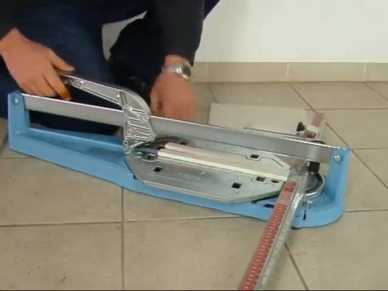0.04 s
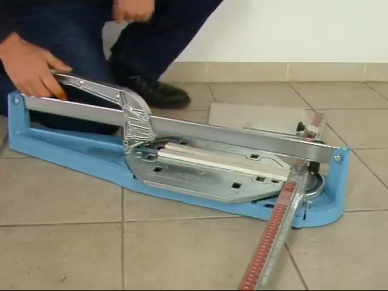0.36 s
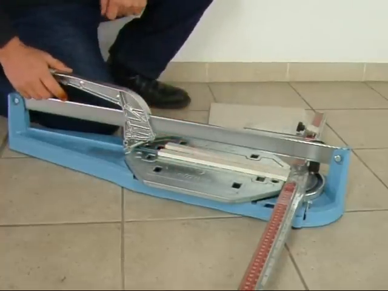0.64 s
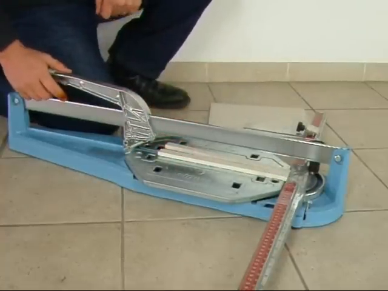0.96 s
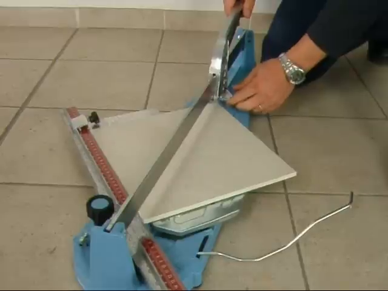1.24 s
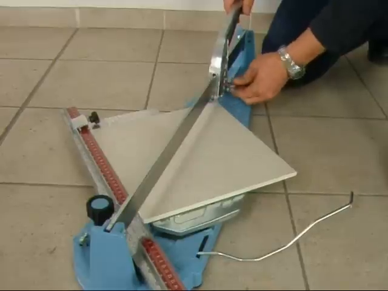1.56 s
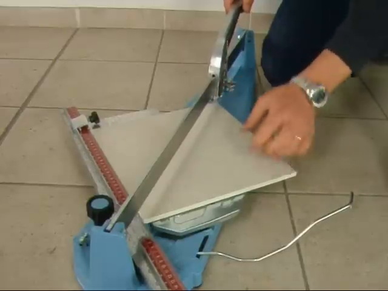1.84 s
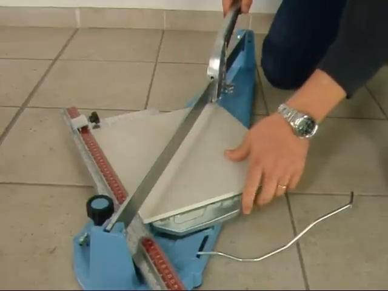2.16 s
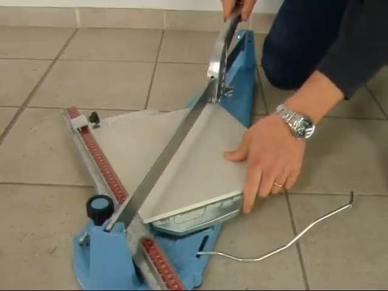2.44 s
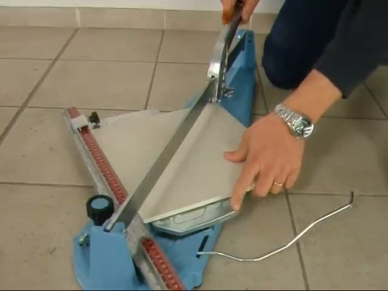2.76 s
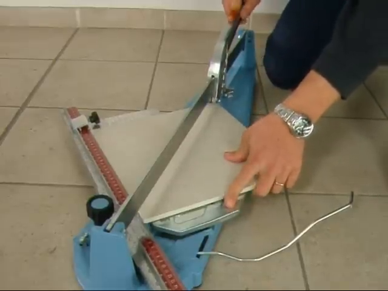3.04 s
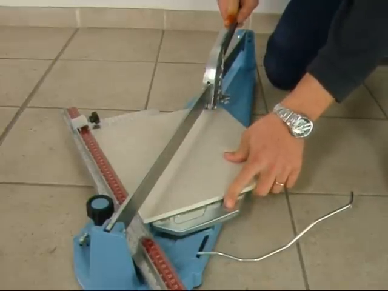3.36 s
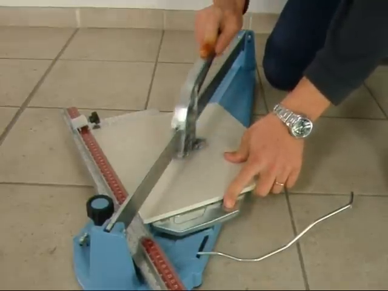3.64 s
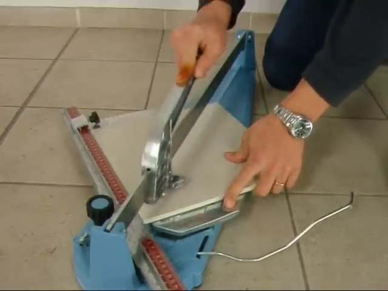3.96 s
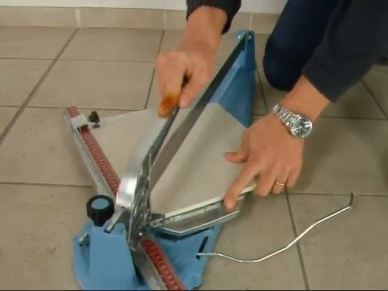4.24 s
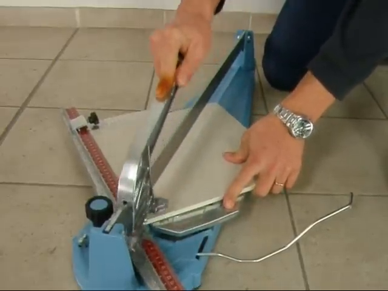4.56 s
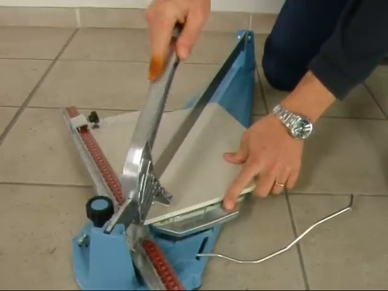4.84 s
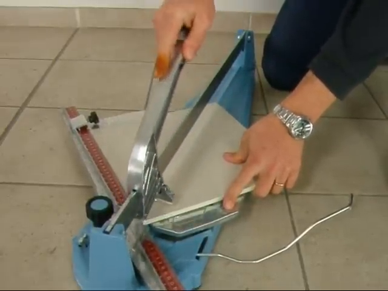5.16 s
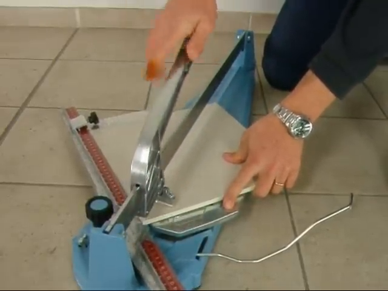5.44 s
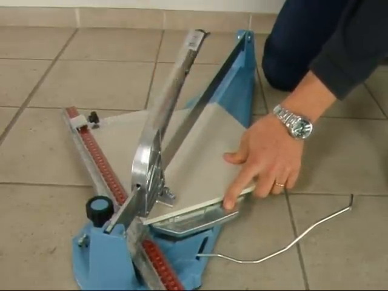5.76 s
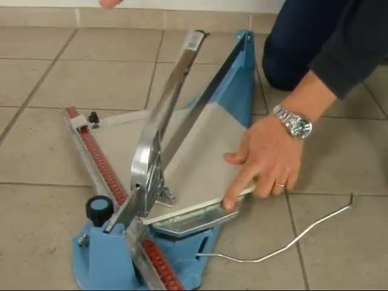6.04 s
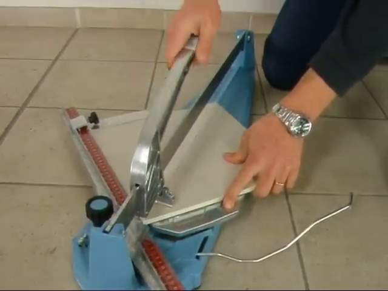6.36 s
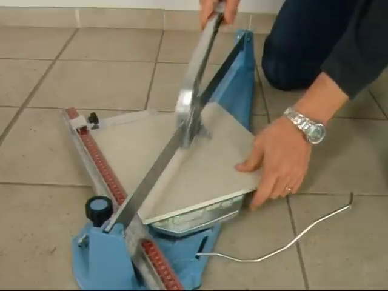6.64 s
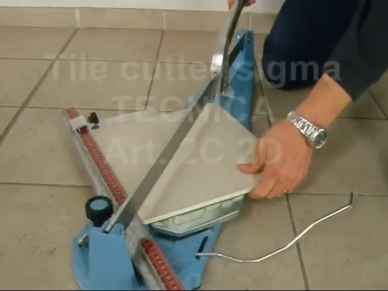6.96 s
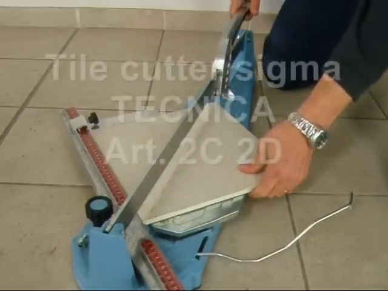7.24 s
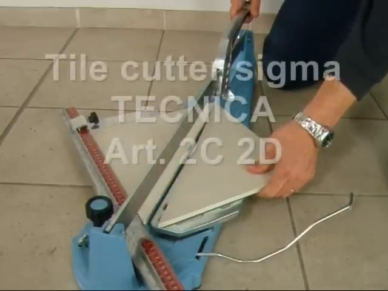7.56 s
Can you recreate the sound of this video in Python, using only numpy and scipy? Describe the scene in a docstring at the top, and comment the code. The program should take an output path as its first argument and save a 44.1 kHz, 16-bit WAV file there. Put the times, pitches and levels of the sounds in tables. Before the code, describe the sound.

In a bare, hard-walled room, clothes rustle as a tile is bumped into place on a manual cutter's ringing steel bed. The wheel taps down several times and scrapes grittily across the glaze, ending in a metal clack. A lever clicks, the tile snaps with a sharp crack, and the carriage slides back softly. The sound is fairly close and grainy, with faint hiss and electrical ticking.

```python
"""A manual tile cutter on the floor of a bare, tiled room. Clothes rustle as a tile is settled on the
sprung steel bed, which bumps and rings. The wheel taps down and is pushed across the glaze, crushing it
and driving the tile's modes. The carriage clacks into its stop, the lever clicks up, the tile snaps and
its halves strike the bed. The carriage slides back. Throughout, hard walls reverberate and a coarse
8-bit converter adds grit and faint electrical ticking."""
import sys
import numpy as np
from scipy import signal
from scipy.fft import rfft, irfft
from scipy.io import wavfile
from scipy.ndimage import uniform_filter1d

SR = 44100
rng = np.random.default_rng(int(sys.argv[2]) if len(sys.argv) > 2 else 0)


def to_wav(sig):
    """Store sig (one row per channel, or 1-D mono) as 16-bit WAV at the path in sys.argv[1].

    Samples outside -1..1 are clipped; the rate is SR.
    """
    pcm = np.clip(np.atleast_2d(sig), -1, 1) * 32767
    pcm = np.round(pcm).astype(np.int16)
    wavfile.write(sys.argv[1], SR, pcm.T)  # frames by channels


N = 335160
TIME_S = np.arange(N) / SR
CONVERTER_HZ, LSB = 16000, 1 / 128

# interference bursts in each cycle: (start [s], tick spacing [s], ticks [count], polarity [+/-1])
TICK_BURSTS = [(.001, .00256, 6, 1), (.0393, .00512, 4, -1), (.0436, .00256, 7, 1)]
# room decay: (frequency [Hz], t60 [s])
ROOM_T60 = [(150, 0.65), (600, 1.1), (1700, 1.2), (4500, 0.91), (8000, .7), (12000, 0.65)]

# spectra of hiss, friction and crushed glaze: (frequency [Hz], density [dB])
HISS_SPECTRUM = [(20, 10), (150, 3.5), (1000, -8), (4000, -11.5), (12000, -12.5)]
CLOTH_SPECTRUM = [(24, -112), (40, -36), (55, -11.5), (123, -2.5), (283, -6.5), (343, -2.5), (425, -5.5),
                  (539, 2), (622, -4.5), (1270, -6.5), (8000, -19.5)]
SLIDE_SPECTRUM = [(40, -35), (102, -14), (404, -13), (658, -2), (821, -10), (897, -1), (1400, -11),
                  (1630, -2.5), (2080, -6), (8000, -18.5)]
GLAZE_SPECTRUM = [(18, -41), (30, -22.5), (182, -16.5), (253, -19), (377, -6), (497, -11.5), (623, -7.5),
                  (761, -9.5), (1080, -8.5), (1580, -4.5), (2240, -6), (2540, -7), (3790, -5.5), (8000, -6)]
# friction moves: (start [s], length [s], level [dB])
CLOTH_RUSTLES = [(1.125, 0.49, -46), (1.8, 0.9, -56.5), (2.06, 0.29, -51.5), (2.63, .09, -48),
                 (2.88, 0.57, -52), (5.0, .28, -62)]
CARRIAGE_SLIDES = [(4.83, .06, -49), (5.37, .16, -56.5), (6.41, 0.045, -55), (6.54, .45, -49.5),
                   (7.09, 0.1, -57), (7.35, 0.22, -58.5)]

# blows: (time [s], level [dB], tilt [dB/octave], clatter t60 [s], ring [dB])
PLATE_BUMPS = [(1.1295, -33, -2, 0.65, 7), (1.4868, -20.5, -3.5, 0.11, 2), (7.1095, -29, 2.5, 0.11, -2)]  # sprung plate under the tile
BED_KNOCKS = [(1.613, -20.5, 1.5, 0.27, 8.5), (1.6335, -12, 3, 0.045, -10), (2.348, -45, -6.5, 0.12, -3),
              (2.657, -42, -5.5, 0.21, -1.5), (2.692, -41, -3, 0.24, 1), (5.374, -45.5, -0.5, 0.051, 4.5),
              (5.381, -35.5, 1.5, 0.19, 0.5), (6.52, -50, 1.5, 0.22, -4.5), (6.66, -49.5, -3, 0.097, 7.5),
              (6.715, -47, -3.5, 0.13, -2.5)]  # tile and carriage on the steel bed
WHEEL_TAPS = [(2.605, -37.5, -1, 0.096, -14.5), (2.9105, -24.5, 0, .11, 0.5), (3.0635, -30, -1, 0.096, 4),
              (3.102, -32.5, -.5, 0.095, -2.5), (3.175, -42, 0, 0.033, -16), (3.351, -21.5, 1, 0.17, 11),
              (3.3615, -31, 0.5, 0.041, -13), (3.369, -17, 1.5, 0.097, -6), (3.3928, -21, 2, 0.18, 10),
              (3.671, -20, 1.5, 0.13, -12), (3.7993, -23, 8, 0.053, -10.5), (3.8468, -22, 4.5, 0.063, -18),
              (4.2265, -20, 1.5, 0.17, -6.5)]  # wheel lands or chips the glaze
STOP_CLACKS = [(4.345, -19.5, 0.008, 0.059, -3), (4.3505, -21.5, 0, 0.19, -5),
               (4.371, -10.5, 0.0064, 0.067, -10.5)]  # carriage hits its stop
LEVER_CLICKS = [(4.8942, -13, 3.5, 0.029, -13.5), (4.9028, -17, 2.4, 0.09, -12),
                (4.914, -24.5, -1.5, 0.11, -9.5)]  # lever rises, breaker foot flips over
TILE_CRACKS = [(5.9285, -19.5, -5.5, 0.088, -5), (5.9325, -12, -1.5, 0.13, -16.5),
               (5.937, -13.5, 4.5, 0.11, -16.5), (5.9455, -19.5, -3.5, 0.12, 0.5),
               (5.957, -15, 0, 0.036, -13), (5.964, -25.5, 2.5, 0.1, -13)]  # crack runs, halves strike the bed
# dense, quickly damped modes of each part: (frequency [Hz], density [dB])
BED_CLATTER = [(40, -17), (150, -23.5), (330, -25), (470, -7.5), (620, 0), (1050, -4.5), (1400, -1.5),
               (2200, -1.5), (2900, -4.5), (4000, -12), (6000, -15), (8000, -20.5)]
WHEEL_CLATTER = [(40, -14), (300, -21.5), (600, -8), (850, -8.5), (1150, -2.5), (1550, -3.5), (2000, -6.5),
                 (2900, -5.5), (4000, -4.5), (6000, -9.5), (8000, -11)]
RAIL_CLATTER = [(40, -19), (300, -21), (450, -8), (620, 0), (1000, 1), (1250, -9.5), (1600, 1), (2300, 1),
                (4300, -5), (6500, -7), (8000, -6.5)]
LEVER_CLATTER = [(40, -15), (300, -16.5), (450, -16), (620, -1), (1000, -5), (1600, -3.5), (2300, -2),
                 (3200, 1), (4500, -3.5), (6500, -5), (8000, -8.5)]
TILE_CLATTER = [(24, -38), (40, -22.5), (240, -22.5), (653, -6), (809, -6.5), (1160, -1.5), (1370, -6),
                (1500, 1), (2310, -1), (2480, 2.5), (2940, 1), (4400, 2), (5590, -1), (8000, -5)]
# modes that ring on: (frequency [Hz], level [dB], t60 [s])
PLATE_MODES = [(618, 1.5, 0.12), (664, -5, .1), (862, -2.5, 0.2), (904, 0, 0.26), (1037, -3, 0.11),
               (1440, -10, 0.094), (1996, -12, 0.22), (2280, -13, 0.092)]
BED_MODES = [(546, -12, 0.67), (649, -1, 0.19), (681, -10.5, 0.26), (883, -2.5, 0.16), (884, -13, 0.9),
             (1033, 0, 0.11), (1242, 0, 0.22), (1470, -4, 0.081), (1618, 2, 0.12), (1886, -10, 0.61),
             (2076, -8.5, 0.27), (2734, -8, 0.49)]
WHEEL_MODES = [(1103, -1, .18), (1250, 0, 0.23), (1510, -2.5, 0.17), (1604, 4.5, 0.081), (1710, -14.5, .12),
               (2956, -5, 0.22), (3970, -2, 0.062)]
RAIL_MODES = [(640, -10, 0.27), (970, -19.5, 0.077), (1246, -0.5, 0.29), (1606, -6, 0.8), (1510, 4, 0.37),
              (1884, -1, 0.77), (2950, -8.5, 0.13), (3570, -5, 0.14), (3290, 4.5, 0.19), (4750, 3.5, 0.1),
              (5480, -2.5, .3), (6800, -22, 0.21)]
LEVER_MODES = [(643, -8, 0.39), (882, -0.5, 0.49), (2770, -4, 0.33), (3190, -3, 0.74), (3210, -4.5, 0.21),
               (3680, -4, 0.29), (5070, 2, .6), (6650, -7.5, .4)]
TILE_MODES = [(591, 1, 0.4), (1624, -3, .5), (1710, -6.5, 0.58), (1790, -3, 0.52), (2310, -1, 0.31),
              (3230, -3.5, 0.32), (3780, -3.5, .35), (5260, -15, 0.31)]

# tile and wheel modes in scoring: (frequency [Hz], level [dB], time of one crest [s], crest rate [1/s])
SCORE_MODES = [(654, 5.5, 3.8, 1), (1280, 6, 3.42, 1.2), (1588, 9, 3.45, 2), (2620, 6.5, 3.87, 2.7),
               (2935, 7, 3.57, 3.3), (3710, 5.5, 3.58, 1.8), (3948, 9.5, 3.94, 3.4), (4400, 4.5, 3.78, 1.1),
               (4800, 3.5, 3.78, 1.1), (5016, 9, 3.47, 1.25), (5260, 5, 3.68, 2.9), (5755, 9.5, 3.99, 2.4),
               (6250, 5, 4.4, 2.8), (7180, 8, 3.1, 2.5)]
# how hard the wheel bites: (time [s], effort [dB])
SCORE_EFFORT = [(3.4, -20.5), (3.406, -21.5), (3.684, -21), (3.718, -27.5), (3.808, -21.5), (4.134, -31),
                (4.24, -24), (4.33, -27.5)]


def amp(db):
    """Decibels to gain."""
    return 10 ** (np.asarray(db) / 20)


def unit_rms(x):
    """Scales to rms 1."""
    return x / np.sqrt(np.mean(x ** 2) + 1e-20)


def lookup(points, hz):
    """Interpolates (frequency [Hz], value) on a log-frequency axis."""
    points_hz, values = np.transpose(points)
    return np.interp(np.log(hz + 1), np.log(points_hz + 1), values)


def fade(t, t60_s):
    """Exponential decay, 60 dB in t60_s."""
    return np.exp(-np.log(1000) * t / np.maximum(t60_s, 1e-3))


def gesture(start_s, length_s, attack_s, release_t60_s):
    """Envelope of one movement: rise, hold, decay."""
    t = TIME_S - start_s
    return np.clip(t / attack_s, 0, 1) * fade(np.maximum(t - length_s, 0), release_t60_s)


def wander(t, per_s):
    """Slow random curve of about unit size."""
    values = rng.standard_normal(1024)
    return np.interp(t * per_s, np.arange(len(values)), values)


def colour(x, spectrum, tilt_db_per_oct=0):
    """Minimum-phase filter: the spectrum, tilted about 2 kHz, top treble rolled off."""
    hz = abs(np.fft.fftfreq(4096, 1 / SR))
    octaves = np.log2(np.maximum(hz, 500) / 2000)
    log_gain = np.log(amp(lookup(spectrum, hz) + tilt_db_per_oct * octaves))
    log_gain -= np.maximum(hz - CONVERTER_HZ / 2, 0) / 2000
    taps = np.fft.ifft(np.exp(np.conj(signal.hilbert(log_gain)))).real
    return signal.fftconvolve(x, taps[:len(taps) // 2])[:len(x)]


def flat_burst(envelope):
    """Noise burst that excites all frequencies evenly."""
    size = 2 * len(envelope)
    bins = rfft(rng.choice([-1, 1], len(envelope)) * envelope, size)
    power = uniform_filter1d(abs(bins) ** 2, size=400)
    return irfft(bins / np.sqrt(power), size)[:len(envelope)]


def grains(per_s, spread_db):
    """Random tiny fractures or slips: many small, a few large."""
    sizes = amp(spread_db * np.minimum(rng.exponential(1, N), 4))
    return sizes * rng.choice([-1, 1], N) * (rng.random(N) < per_s / SR)


def interference(size, cycle_s=0.1):
    """Repeating electrical spikes over noise, barely enough to flip the converter's last bit."""
    spikes = np.zeros(size)
    cycles_s = np.arange(0, N / SR, cycle_s)[:, None]
    for start_s, spacing_s, count, polarity in TICK_BURSTS:
        at = ((cycles_s + start_s + spacing_s * np.arange(count)) * CONVERTER_HZ).astype(int)
        spikes[at[at < size]] = polarity
    return LSB * (0.62 * spikes + 0.155 * rng.standard_normal(size))


def room(x, build_s=0.018):
    """Hard walls: a diffuse tail, longest in the mid range."""
    hz, t, noise = signal.stft(rng.standard_normal(2 * SR), SR, nperseg=256)
    tail = signal.istft(noise * fade(t, lookup(ROOM_T60, hz)[:, None]), nperseg=256)[1]
    tail *= 1 - np.exp(-(np.arange(len(tail)) / SR / build_s) ** 2)
    return signal.fftconvolve(x, tail / np.linalg.norm(tail))[:N]


def rub(moves, spectrum, spread_db, attack_s, release_t60_s, slips_per_s=3500, uneven_db=2):
    """Light friction: small slips coloured by the surface, under uneven pressure."""
    power = sum((amp(db) * gesture(start_s, length_s, attack_s, release_t60_s)) ** 2
                for start_s, length_s, db in moves)
    pressure = amp(uneven_db * wander(TIME_S, per_s=85))
    slips = unit_rms(colour(grains(slips_per_s, spread_db), spectrum))
    return np.sqrt(power) * pressure * slips


def strike(blows, spectrum, modes, contact_db, contact_t60_s, ring_db, rise_s):
    """Each blow: a sharp contact, a short clatter of dense modes, a few modes that ring on."""
    out = np.zeros(N)
    t = np.arange(SR * 3 // 4) / SR
    attack = t < 0.01
    rise = 1 - np.exp(-t / rise_s)
    decays = [(hz, amp(db) * fade(t, t60_s)) for hz, db, t60_s in modes]
    ring_rms = np.sqrt(sum(np.mean(decay[attack] ** 2) for _, decay in decays) / 2)
    for time_s, db, tilt_db_per_oct, t60_s, blow_ring_db in blows:
        envelope = fade(t, t60_s) + amp(contact_db) * fade(t, contact_t60_s)
        clatter = colour(flat_burst(envelope) * rise, spectrum, tilt_db_per_oct)
        clatter /= np.sqrt(np.mean(clatter[attack] ** 2))
        # loose parts rattle and blur each mode's pitch
        ring = sum(decay * np.sin(2 * np.pi * (hz * t + rng.random()) + 1.3 * wander(t, per_s=60))
                   for hz, decay in decays)
        blow = clatter + amp(ring_db + blow_ring_db) * rise * ring / ring_rms
        slot = out[round(time_s * SR):][:len(blow)]
        slot += amp(db) * blow[:len(slot)]
    return out


def score_resonance(hz, t, boost_db=4.5, sag_per_s=0.15, waver=0.016, crest_half_s=0.094):
    """Gain over frequency and time: each mode swells as the wheel crosses one of its crests."""
    peaks = 0
    for mode_hz, db, crest_s, crests_per_s in SCORE_MODES:
        past_crest_s = (((t - crest_s) * crests_per_s + 0.5) % 1 - 0.5) / crests_per_s
        # pitch sags with travel, wavers with load
        centre_hz = mode_hz * (1 - sag_per_s * past_crest_s + waver * wander(t, per_s=20))
        width_hz = 125 * (mode_hz / 2000) ** 0.38
        drive = amp(db + boost_db) * np.exp(-(past_crest_s / crest_half_s) ** 2)
        peaks += drive / (1 + (2 * (hz[:, None] - centre_hz) / width_hz) ** 2)
    return np.sqrt(1 + peaks ** 2)


def scoring(start_s=3.395, middle_s=3.76, length_s=0.935, flicker_db=3):
    """The wheel crushes the glaze from edge to edge; tiny chips excite the tile."""
    hz, t, chips = signal.stft(grains(per_s=4500, spread_db=2.5), SR, nperseg=1024)
    flicker = uniform_filter1d(rng.standard_normal(chips.shape), size=4, axis=0)
    flicker = unit_rms(uniform_filter1d(flicker, size=14, axis=1))
    chips = chips * amp(lookup(GLAZE_SPECTRUM, hz))[:, None]
    chips *= score_resonance(hz, t) * amp(flicker_db * flicker)
    effort_db = np.interp(TIME_S, *np.transpose(SCORE_EFFORT))
    # the tile drums most near its middle; its body speaks most at the near edge
    drum_db = effort_db - 28.5 + 7 * np.exp(-((TIME_S - middle_s) / 0.13) ** 2)
    body_db = 0.41 * effort_db - 25.5 + 7 * np.exp(-np.maximum(TIME_S - start_s, 0) / 0.06)
    treble_db = effort_db + 3
    band_of_bin = np.digitize(hz, [500, 2200])
    out = np.zeros(N)
    for k, db in enumerate([drum_db, body_db, treble_db]):
        band = signal.istft(chips * (band_of_bin == k)[:, None], nperseg=1024)[1][:N]
        # the modes share the energy that the hand puts in
        running_rms = np.sqrt(uniform_filter1d(band ** 2, size=2500) + 1e-20)
        out += amp(db) * band / running_rms
    return out * gesture(start_s, length_s, attack_s=0.012, release_t60_s=0.07)


def scene():
    """Blows, scoring and friction in the room; mono."""
    blows = strike(BED_KNOCKS, BED_CLATTER, BED_MODES,
                   contact_db=-2, contact_t60_s=0.036, ring_db=-7, rise_s=0.00091)
    blows += strike(PLATE_BUMPS, BED_CLATTER, PLATE_MODES,
                    contact_db=-1, contact_t60_s=0.019, ring_db=-3, rise_s=0.0012)
    blows += strike(WHEEL_TAPS, WHEEL_CLATTER, WHEEL_MODES,
                    contact_db=-3.5, contact_t60_s=0.0068, ring_db=-7, rise_s=0.00069)
    blows += strike(STOP_CLACKS, RAIL_CLATTER, RAIL_MODES,
                    contact_db=7.5, contact_t60_s=0.0052, ring_db=-6.5, rise_s=0.00022)
    blows += strike(LEVER_CLICKS, LEVER_CLATTER, LEVER_MODES,
                    contact_db=7, contact_t60_s=0.0046, ring_db=-10, rise_s=0.00014)
    blows += strike(TILE_CRACKS, TILE_CLATTER, TILE_MODES,
                    contact_db=-10, contact_t60_s=0.017, ring_db=-11.5, rise_s=0.00033)
    friction = scoring()
    friction += rub(CARRIAGE_SLIDES, SLIDE_SPECTRUM, spread_db=3, attack_s=0.037, release_t60_s=0.35)
    friction += rub(CLOTH_RUSTLES, CLOTH_SPECTRUM, spread_db=2, attack_s=0.025, release_t60_s=0.56)
    return (blows + amp(-12) * room(blows) + friction + amp(-7) * room(friction))[None]


def record(dry, hiss_db=-73, cutoff_hz=12400):
    """Slow 8-bit converter: clips at full scale, idles one step above zero. Then hiss and low-pass."""
    sampled = signal.resample_poly(dry[0], CONVERTER_HZ, SR)
    sampled = np.clip(sampled, -1, 1) + interference(len(sampled))
    quantised = np.round(sampled / LSB + 1) * LSB
    held = quantised[np.arange(N) * CONVERTER_HZ // SR]  # mirrors the treble upwards
    hiss = amp(hiss_db) * unit_rms(colour(rng.standard_normal(N), HISS_SPECTRUM))
    lowpass = signal.firwin(401, cutoff_hz, window=("kaiser", 8), fs=SR)
    return signal.fftconvolve(held + hiss, lowpass, "same")[None]


dry = scene()
out = record(dry)
to_wav(out)
```